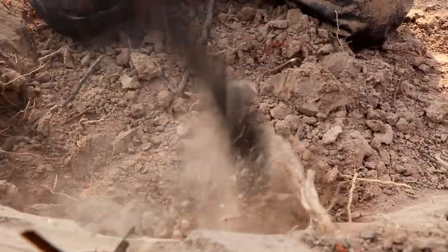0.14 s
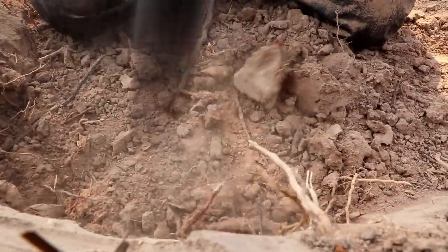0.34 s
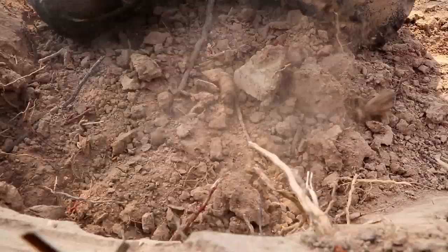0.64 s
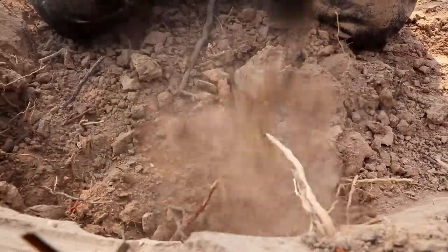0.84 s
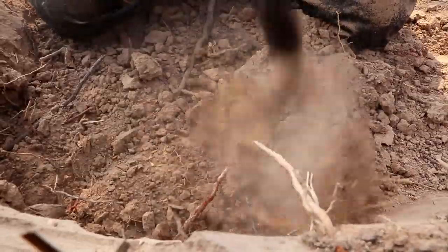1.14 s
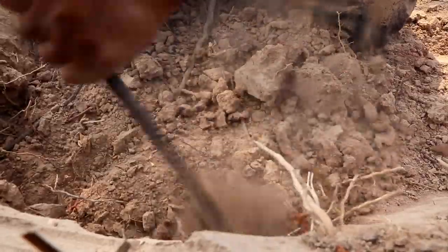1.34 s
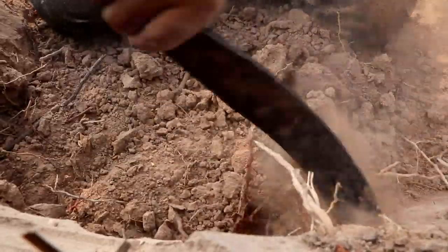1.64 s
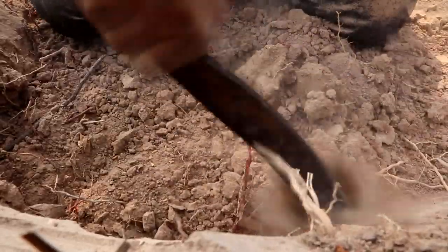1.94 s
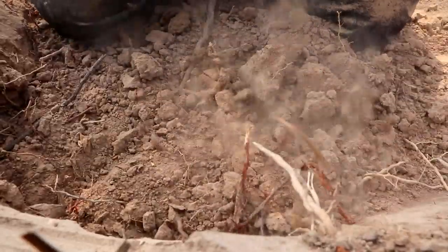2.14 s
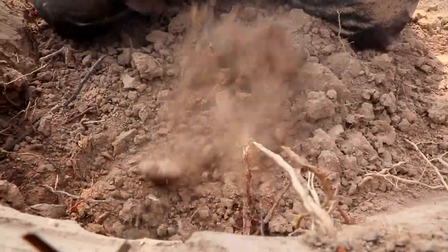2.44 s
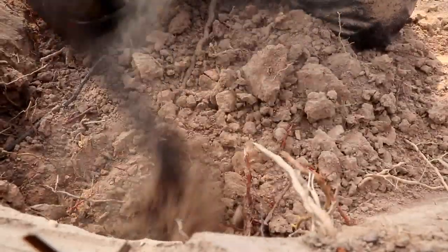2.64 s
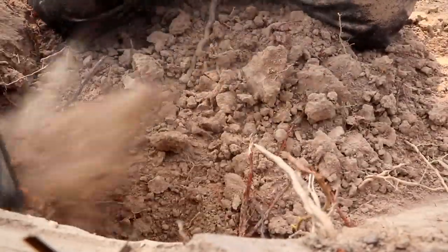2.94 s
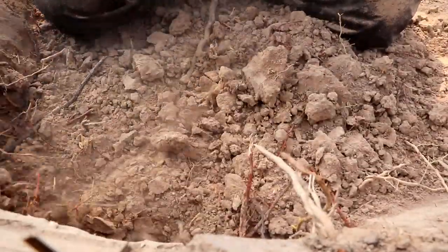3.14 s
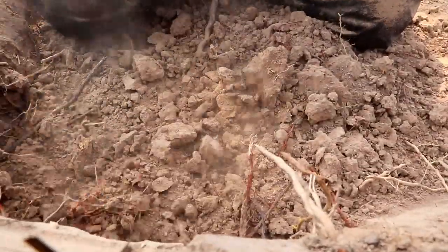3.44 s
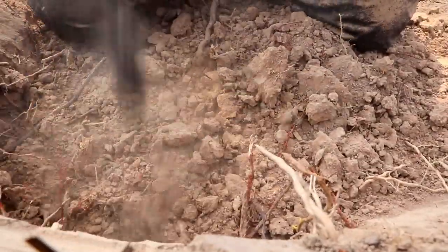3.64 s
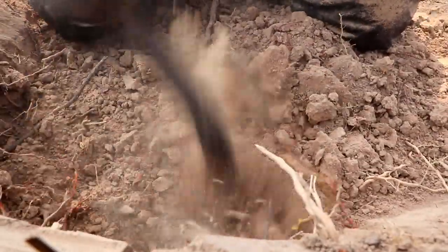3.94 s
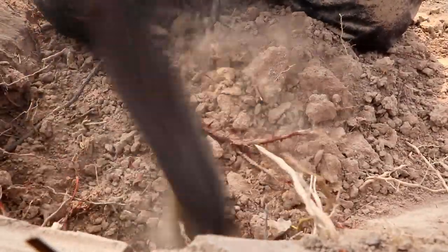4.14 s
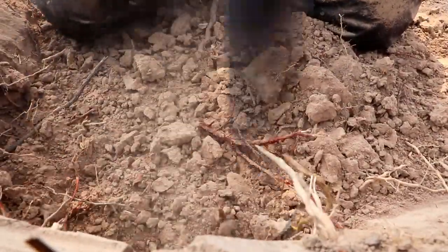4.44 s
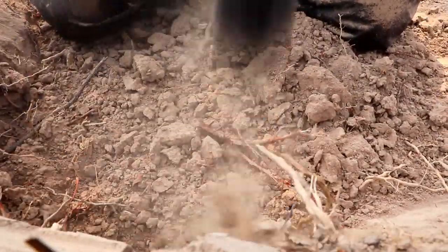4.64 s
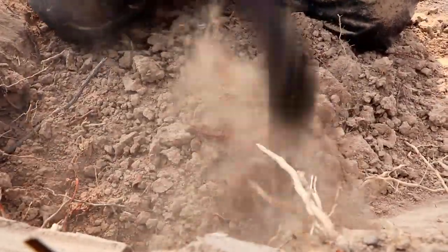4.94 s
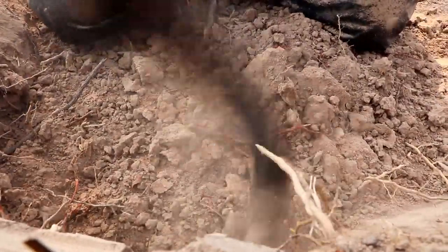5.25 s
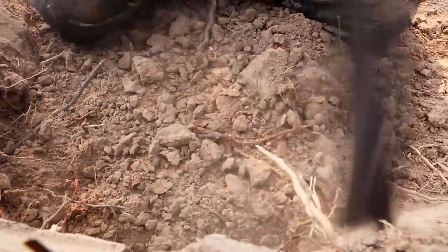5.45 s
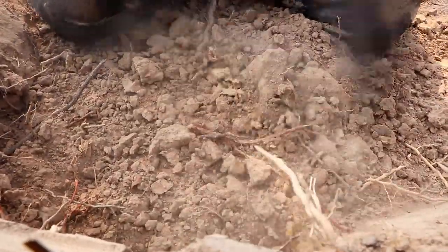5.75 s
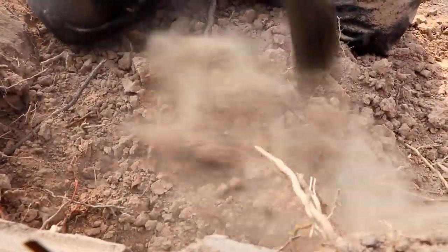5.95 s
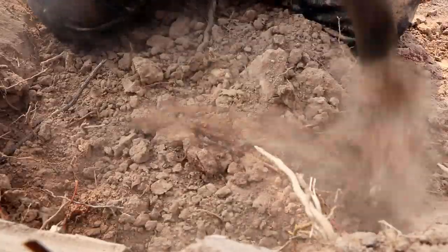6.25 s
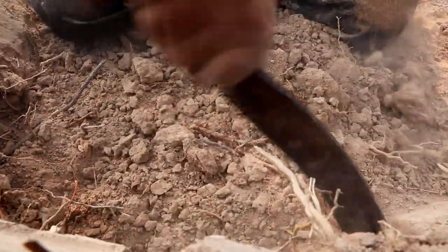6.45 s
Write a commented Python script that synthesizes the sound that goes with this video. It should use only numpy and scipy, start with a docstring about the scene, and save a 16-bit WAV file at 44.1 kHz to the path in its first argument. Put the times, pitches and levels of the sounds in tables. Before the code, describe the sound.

A long steel blade chops rapidly into dry, hard ground, with gritty scrapes and clods of earth falling between strokes.

```python
"""A long steel blade chops dry, hard ground about three times a second, at the rim of a pit, close to
a phone's stereo microphone. Each chop slices in, stops with a thud and ploughs on; grit scrapes the
blade as it is pulled out and makes it ring. Pebbles and clods land in between, over a trickle of
loose soil and a little low wind on the microphone."""
import sys
import numpy as np
from scipy import signal
from scipy.io import wavfile
from scipy.ndimage import uniform_filter1d

SR = 44100
rng = np.random.default_rng(int(sys.argv[2]) if len(sys.argv) > 2 else 0)


def output_pcm(signal):
    """Save a mono or channel-first signal as 16-bit PCM at the path in sys.argv[1].

    Samples are clipped to [-1, 1] before scaling.
    """
    pcm = np.clip(np.atleast_2d(signal).T, -1, 1) * 32767
    wavfile.write(sys.argv[1], SR, np.round(pcm).astype(np.int16))


N = 290178


def undb(db):
    return 10 ** (np.asarray(db) / 20)


def ring(x, modes, levels=None):
    """Sum of two-pole resonances, each driven at its own level in time; white noise keeps its level."""
    out, click, response = 0, np.eye(1, 8192)[0], 0
    for k, (hz, width, db) in enumerate(modes):
        b, a = signal.iirpeak(hz, hz / width, SR)
        gain = (-1) ** k * undb(db)
        out = out + gain * signal.lfilter(b, a, x if levels is None else levels[k] * x)
        response = response + gain * signal.lfilter(b, a, click)
    return out / np.sqrt(np.sum(response ** 2))


def grains(alike, scatter_db, grain_ms, lag=0):
    """Stereo noise in grains of random size; the share `alike` is in both sides, `lag` samples late right."""
    length = max(int(grain_ms * SR / 1000), 1)
    grain_db = scatter_db * np.minimum(rng.exponential(size=N)[:N // length + 1], 4)
    sizes = uniform_filter1d(np.repeat(undb(grain_db), length)[:N], length)
    shared, left, right = rng.standard_normal((3, N)) * sizes / np.sqrt(np.mean(sizes ** 2))
    centre = np.array([shared, np.roll(shared, lag)])
    return np.sqrt(alike) * centre + np.sqrt(1 - alike) * np.array([left, right])


def swell(ms, rise_ms, fall_ms):
    """Exponential rise up to a contact, exponential fall after it."""
    return np.exp(np.minimum(ms, 0) / rise_ms - np.maximum(ms, 0) / fall_ms)


# Wind at the microphone: (time [s], level [dB])
WIND_LEVELS = [(0.0, -61), (1.7, -56), (2.09, -63.5), (2.66, -56.5), (4.56, -58.5), (4.78, -50.5),
               (5.22, -59), (6.58, -55)]


def wind():
    """Air moving over the phone rumbles low."""
    s, db = np.transpose(WIND_LEVELS)
    rumble = ring(grains(.59, .46, 45), [(34, 13, .5), (69, 74, 3.5), (112, 153, -2.5)])
    return undb(np.interp(np.arange(N) / SR, s, db)) * rumble


# Resonances of grit, fine dust and clods: (frequency [Hz], width [Hz], level [dB])
GRIT_MODES = [(1182, 950, 18.5), (2067, 920, 23), (3230, 1810, 19.5), (4314, 560, 17.5)]
HISS_MODES = [(5080, 2600, -10), (7780, 3980, -9), (11490, 2200, -14), (13160, 2000, -19.5)]
CLOD_MODES = [(194, 188, 1), (314, 173, -1), (523, 130, -5)]
# Soil that slides all the time: (grit [dB], clods [dB], hiss [dB])
SLIDE_DB = (-53.5, -55.5, -53)


def trickle(rise_ms=146, fade_ms=120, dust_db=-.55):
    """Loose soil hisses and single crumbs stand out; what each chop throws up patters back after it."""
    ms = np.arange(N) / SR * 1000
    power = np.outer(undb(SLIDE_DB) ** 2, np.ones(N))
    for row in BLADE_CHOPS:
        delay_ms, fall_db, clod_db = row[14:]
        fall = swell(ms - row[0] * 1000 - delay_ms, rise_ms, fade_ms)
        power += np.outer(undb([fall_db, fall_db + clod_db, fall_db + dust_db]), fall) ** 2
    grit, thud, hiss = np.sqrt(power)
    crumbs = ring(grit * grains(.25, 3, 1.2), GRIT_MODES)
    clods = ring(thud * grains(.85, 3.5, 4), CLOD_MODES)
    dust = ring(hiss * grains(.25, 3.8, .8), HISS_MODES)
    return crumbs + clods + dust


def favour(modes, pitch_hz, lift_db, octaves):
    """The place of contact drives the resonances near one pitch harder (dB per resonance)."""
    distance = np.log2(np.array(modes)[:, 0] / pitch_hz) / octaves
    return lift_db * (np.exp(-distance ** 2) - .5)


# Left minus right microphone port: (ground [dB], grit [dB], hiss [dB], blade [dB])
MIC_BALANCE_DB = (2.5, 1.7, 2.6, 1)


def contact(power, row, shapes, knock_db=None):
    """One touch feeds ground, grit, hiss and blade, as far as it has shapes (envelopes over ms)."""
    s, level_db, thud_db, hiss_db, pan_db, blade_db, pitch_hz = row[:7]
    if knock_db is None:  # a small contact's hollow knock follows its thud
        knock_db = -4 + .58 * thud_db
    at = slice(max(int((s - .07) * SR), 0), min(int((s + .16) * SR), N))
    ms = (np.arange(at.start, at.stop) / SR - s) * 1000
    nearest_hz = min((mode[0] for mode in BLADE_MODES), key=lambda hz: abs(np.log(hz / pitch_hz)))
    taken_db = 10 * np.log10(1 + undb(2 * blade_db))  # what rings in the steel is lost to grit and hiss
    drives_db = (np.where(np.array(GROUND_MODES)[:, 0] < 400, thud_db, knock_db),
                 favour(GRIT_MODES, pitch_hz, 2.5, .4) - taken_db,
                 hiss_db + favour(HISS_MODES, pitch_hz, 7, .2) - taken_db / 2,
                 blade_db + favour(BLADE_MODES, nearest_hz, 9, .05) - taken_db)
    for layer, port_db, db, shape in zip(power, MIC_BALANCE_DB, drives_db, shapes):
        sides_db = (pan_db + port_db) * np.array([[.5], [-.5]])
        layer[:, :, at] += (undb(level_db + db[:, None, None] + sides_db) * shape(ms)) ** 2


# Landings near the phone. Every contact opens with the same seven columns; "rel" is against its level:
# (time [s], level [dB], thud [dB rel], hiss [dB rel], left minus right [dB], blade over grit [dB],
#  favoured pitch [Hz], decay [ms])
LANDINGS = [(0.0315, -38, -10, 10, -3, -19, 6700, 3.7), (0.272, -14, -29, -8, -2, 3.5, 3840, 3.6),
            (0.299, -18, -10, -17, -5, -8, 1690, 1.5), (0.364, -20, -4.5, -14, -5, -22, 3120, 5.1),
            (0.369, -26, -15, 8.5, -2, -17, 2630, 2.5), (0.4575, -45, -22, 18.5, 4, -8, 7370, 6.2),
            (0.4724, -45, -4, 19, 5, -13, 1700, 4.2), (0.627, -42, -22, 9, -5, -8, 7880, 3.9),
            (0.634, -35, -9, 3, -2.5, -5, 7690, 11), (0.6502, -27, -22, 4, -5, -17, 7650, 4.7),
            (0.662, -46, -22, 9, 3, -8, 7800, 6.8), (0.682, -33, -27, 2, -10, -3, 7870, 3.8),
            (0.6933, -32.5, -31, 8.5, 1, 7, 8260, 4.5), (0.7007, -33, -24, -6, -13, 11, 8090, 7.8),
            (0.721, -16, -39, -19, -8, 23, 2520, 1.5), (0.7835, -34, -2, 9, -14, -14, 2120, 1.7),
            (0.966, -20.5, -5, -3, -3, -23, 1220, 4), (0.9838, -41, -22, 16, -4, -6, 7700, 1.9),
            (1.0395, -39.5, -24, 13.5, -5, -1, 6130, 3.3), (1.062, -34.5, -3, 3, -5, -2, 3780, 4.9),
            (1.253, -15.5, -28, 13, -4, 15, 2050, 3.9), (1.277, -34, -20, -10, -9, -10, 3230, 2.8),
            (1.313, -22.5, -17, 10, -7, -18, 6750, 2.3), (1.6089, -12, -6, -7, -4, -9, 2520, 2.6),
            (1.629, -30, -29, 10, -11, 1, 6160, 3.4), (1.7075, -31, 4.5, 3, -8, -2, 2400, 3.7),
            (2.022, -35, -24, 12, 3, -14, 2980, 2.8), (2.218, -37.5, -30, -10, -22, -3, 2880, 1.9),
            (2.2264, -41, -28, 15.5, -4, -8, 5800, 4), (2.245, -36.5, -26, 14, -4, 0, 5900, 2.4),
            (2.3722, -15.5, -1.5, -3, -2, -15, 1420, 7.2), (2.9122, -35.5, -2, 0, -4, -8, 2760, 21),
            (3.7454, -40.5, -1, 15, -2, -2, 6070, 5.9), (4.1577, -27.5, -22, 3.5, -6, -6, 5550, 5.3),
            (5.676, -22.5, -31, 7, 1, -12, 3010, 1.8), (5.922, -18.5, -16, 2, -8, 1, 1820, 12),
            (6.3747, -31, -6, -17, -7, -14, 1470, 7.5), (6.5494, -33, -15, 7, -8, -3, 1770, 1.5)]


def pebbles(power):
    """Pebbles and clods land with a sharp edge and die away at once."""
    for row in LANDINGS:
        contact(power, row, [lambda ms: swell(ms, .1, row[7])] * 4)


# The blade at the rim, close up: (seven contact columns, hollow knock [dB rel], blow decay [ms],
#  slice [dB rel], slice rise [ms], plough [dB rel], slump [dB rel], boom [dB rel],
#  delay of falling soil [ms], its grit [dB], its clods over its grit [dB])
BLADE_CHOPS = [(0.188, -6.5, -2.5, -2, -1, -20, 1434, -6.5, 6.2, -4, 9.7, -26, -43, -19, 160, -37.5, -3.5),
               (0.5048, -7.5, -8, -1, -3, -21, 1790, -10.5, 9.5, -1.5, 9.6, -58, -40, -17, 242, -43, -3.5),
               (0.8151, -3, -19, -8.5, -3, 0.5, 2430, -14, 5.8, -5.5, 9.1, -23.5, -37, -35, 170, -43, -2.5),
               (1.1149, -10, -18, -5.5, -5, -5, 2780, -15, 6.1, -25, 15, -30, -21, -49, 191, -41.5, -4),
               (1.441, -2, -9.5, -4.5, -1.5, -18, 1660, -10.5, 9.4, -17, 6.1, -28.5, -42, -51, 175, -40.5, -8),
               (1.7356, -10, -5, -2, -4, -10.5, 2580, -6.5, 7.2, -12, 17, -19.5, -37, -24, 121, -40, -8.5),
               (2.0412, -5.5, -27, -25, -3.5, 1, 2900, -18, 3.4, -27, 7, -31, -24, -48, 229, -45.5, -11),
               (2.359, -6.5, -21, -4, -0.5, 2, 1310, -12, 9, -13.5, 6.4, -20.5, -20.5, -31, 194, -39.5, -9),
               (2.6646, -2, -4, -1.5, -2.5, -11, 1043, -6.5, 3.25, -17, 6.5, -20.5, -35, -29, 110, -44, -3),
               (2.9935, -7, -13.5, -3, -1, -35, 1410, -10.5, 8.5, -14.5, 12.7, -27, -27, -57, 113, -44.5, -0.5),
               (3.3053, -4, -5, -3.5, -2, -7, 1460, -18.5, 6.1, -5.5, 5.2, -20, -29, -79, 100, -40.5, -9.5),
               (3.6167, 8.5, -15.5, -6.5, -1, -2.5, 1870, -16, 2.04, -24.5, 5.7, -27, -33.5, -29.5, 131, -41.5, -6.5),
               (3.9479, 1.5, -13, -4, -2.5, -20, 4010, -9, 4.6, -15, 6.4, -24, -29, -47, 244, -43.5, 0.5),
               (4.2699, 0.5, -11, -2.5, -2, 0, 2400, -12, 4.5, -14.5, 5.2, -22.5, -27, -38, 120, -45.5, -5),
               (4.594, 2, -13.5, -3.5, -3, -15.5, 1062, -5.5, 4.1, -20, 5.8, -28.5, -28, -36, 189, -48, -1),
               (4.9222, -2, -12, -5, -2, -9.5, 1100, -15, 4.5, -10.5, 5.1, -22.5, -26, -49, 140, -40, -4.5),
               (5.2538, -9.5, -9, -1.5, -1.5, -25, 2280, -5.5, 8.1, -2.5, 8.5, -21, -15.5, -23, 190, -53.5, 0.5),
               (5.5732, -1.5, -13, -6, -4, -4, 2820, -15.5, 3.8, -19, 6.6, -18, -26, -49, 97, -42.5, -8),
               (5.9022, -2, -12, -8, 0.5, 1, 3160, -15, 8, -25.5, 12.4, -29, -47, -30, 90, -42.5, -7.5),
               (6.2402, -10.5, -12, -1, -5, -11, 1650, -16, 9.4, -10, 5, -26.5, -25, -23, 194, -44.5, -3.5),
               (6.568, -12.5, -17, -4, -4, -5, 1720, -15, 15, -4, 7.3, -27, -22, -47, 150, -55, -6)]


def chops(power, plough_ms=43.4, stop_ms=11, rub_db=6, crumble_db=3):
    """The blade slices in, strikes, and ploughs on at an even level until the soil stops it."""
    for row in BLADE_CHOPS:
        knock_db, blow_ms, slice_db, slice_ms, plough_db, slump_db = row[7:13]
        blow = lambda ms: swell(ms, .1, blow_ms)
        cut = lambda ms: (ms < 0) * undb(slice_db) * swell(ms, slice_ms, 1)
        plough = lambda ms: (ms >= 0) * undb(plough_db) * (1 - np.tanh((ms - plough_ms) / stop_ms)) / 2
        earth = lambda ms: blow(ms) + cut(ms) + plough(ms)
        # ploughing crumbles fine dust; slicing in rubs the still undamped steel
        dust = lambda ms: blow(ms) + cut(ms) + undb(crumble_db) * plough(ms)
        steel = lambda ms: blow(ms) + undb(rub_db) * cut(ms) + plough(ms)
        contact(power, row, (earth, earth, dust, steel), knock_db)
        # the lifted earth slumps with a soft low thump when the blade stops
        slump = (row[0], row[1], slump_db, 0, row[4], 0, row[6])
        contact(power, slump, [lambda ms: swell(ms - plough_ms, 4.4, 4.4)], knock_db=slump_db - 12)


def booms(boom_hz=55, decay_s=.015):
    """A deep, quickly damped shake of the ground under every chop."""
    blows, s = np.zeros(N), np.arange(SR // 10) / SR
    for row in BLADE_CHOPS:
        blows[int(row[0] * SR)] = undb(row[1] + row[13])
    shake = np.sin(2 * np.pi * boom_hz * s) * np.exp(-s / decay_s)
    return signal.fftconvolve(blows, shake)[:N]


def clanks(clank_db=-9, decay_ms=4.9):
    """Every chop meets a hard lump that rings briefly at its own pitch."""
    out, s = np.zeros((2, N + SR // 20)), np.arange(SR // 20) / SR
    for row in BLADE_CHOPS:
        i, sides_db = int(row[0] * SR), row[4] * np.array([[.5], [-.5]])
        tone = np.sin(2 * np.pi * row[6] * s) * np.exp(-s * 1000 / decay_ms)
        out[:, i:i + len(s)] += undb(row[1] + clank_db + sides_db) * tone
    return out[:, :N]


# Grit on the steel, close up: (seven contact columns, rise [ms], fade [ms])
GRIT_SCRAPES = [(0.3176, -29, -3.5, -1.5, -4, -12, 1470, 28, 11),
                (0.5906, -36.5, -22, 0.5, -3, 3, 1930, 15, 15), (0.917, -20, -19, -5, -3, 3, 3270, 20, 27),
                (1.137, -13.5, -7, -3, -2.5, -6, 2830, 6.3, 12),
                (1.2144, -26, -23, -3, -2, -4, 2900, 30, 25), (1.5, -25.5, -11, -3, -3, -3, 1890, 4.5, 19),
                (1.5394, -29.5, -22, 2, -3.5, -3, 4300, 24, 35),
                (1.6501, -34, -33, 3, -13, 1, 3480, 15, 21), (1.8103, -31, -40, 1, -4, -4, 2050, 17, 21),
                (1.8318, -17.5, -29, -1, -7.5, 9, 1980, 3.5, 6),
                (1.907, -35, -11, -9, -11, 0, 1920, 38, 8.6),
                (2.0497, -11.5, -14.5, -1.5, -3, -3, 2740, 11, 16.1),
                (2.139, -25, -26, -1.5, -2, 4, 3020, 11, 15.5),
                (2.1617, -18, -45, 7, -3, 9.5, 3080, 8.8, 4.7),
                (2.452, -28.5, -15, -1, -2, -0.5, 2160, 8.6, 19),
                (2.758, -25, -31, 1.5, -2, -3, 4030, 3.2, 14.4),
                (2.806, -37.5, -7, 8, -6, 0, 4070, 3.2, 9.1),
                (3.0774, -33.5, -33, 4.5, -1, -7, 1840, 2.3, 79),
                (3.127, -34, -29, 0, -3, -9, 990, 39, 4.3), (3.411, -28, -19, 3, -3, -5, 1900, 3.7, 11),
                (3.448, -36, -3, 6.5, -4, -16, 5800, 18, 33), (3.722, -31.5, -26, 3, -2, -1, 2150, 2.8, 18),
                (4.042, -34.5, -23, -2, -3, -1, 2620, 30, 54), (4.086, -35, -3.5, -1, -5, 0, 3500, 40, 3.9),
                (4.374, -34, -18, 0, -4, 8, 2090, 26, 5.5), (4.7, -25, -12, 3.5, -2.5, 1, 2930, 14, 6.1),
                (4.722, -20, -14.5, -1.5, -2.5, -2.5, 4320, 8.3, 17),
                (4.789, -36, 0, -5, -4, -5, 3540, 4.9, 15), (4.9656, -23.5, -19, -5, -3, -3, 1860, 15, 20),
                (5.0472, -26, -13, -2.5, -6, -2, 1640, 2.8, 8.6),
                (5.198, -37.5, -19, 8.5, -3, -1, 3100, 3.2, 5.7),
                (5.2345, -16.5, -10, -8, -2.5, 1.5, 2660, 6.7, 33),
                (5.3494, -37, -35, 1.5, -4, -9, 2800, 56, 52), (5.669, -24, -36, -34, -5, 8, 2800, 6.4, 29),
                (5.746, -22, -30, -30, -2, 6, 2490, 15, 14), (5.991, -26, -40, -1, -4.5, 4, 2750, 8.8, 23),
                (6.0726, -39, -4.5, 6, -6, -5, 2800, 4.6, 24),
                (6.3028, -18.5, -29, -1, -4, -1, 2580, 8.4, 12)]


def scrapes(power):
    """Grit dragged along the blade swells and fades."""
    for row in GRIT_SCRAPES:
        contact(power, row, [lambda ms: swell(ms, row[7], row[8])] * 4)


def pushes(rows, push_db, push_ms):
    """Every sudden stop pushes once, a short half-sine."""
    out, length = np.zeros(N), push_ms * SR / 1000
    half_sine = np.sin(np.pi * np.arange(int(length)) / length)
    for row in rows:
        i = int(row[0] * SR)
        out[i:i + len(half_sine)] = undb(push_db) * half_sine
    return out


# Resonances of the hard ground and the steel blade: (frequency [Hz], width [Hz], level [dB])
GROUND_MODES = [(130, 60, -13), (190, 70, -8), (290, 65, 0), (500, 100, -7), (668, 85, -2), (915, 120, -6)]
BLADE_MODES = [(1260, 65, -6), (1800, 90, -11), (2060, 65, 1), (2480, 55, -10), (3030, 80, 2),
               (3300, 110, -11), (4200, 80, -3), (5360, 110, -2), (6480, 110, -10), (8020, 110, -5)]


def digging():
    """Particles crushed in every landing, chop and scrape excite the ground, the air and the blade."""
    layers = (GROUND_MODES, GRIT_MODES, HISS_MODES, BLADE_MODES)
    power = [np.zeros((len(modes), 2, N), np.float32) for modes in layers]
    pebbles(power)
    chops(power)
    scrapes(power)
    ground, grit, hiss, blade = map(np.sqrt, power)
    crack = pushes(BLADE_CHOPS + LANDINGS, push_db=-2.5, push_ms=.31)
    shove = pushes(BLADE_CHOPS, push_db=3, push_ms=.45)
    crunch = ring(grains(.2, 2.5, .6, lag=3) + crack, GRIT_MODES, grit)
    # small particles radiate no bass
    crunch = signal.sosfilt(signal.butter(2, 800, "high", fs=SR, output="sos"), crunch)
    fizz = ring(grains(.59, 2.5, .3), HISS_MODES, hiss)
    # clods break duller than loose dust trickles
    fizz = signal.sosfilt(signal.butter(1, 13500, fs=SR, output="sos"), fizz)
    thud = ring(grains(.84, .36, .82, lag=1) + shove, GROUND_MODES, ground)
    steel = ring(grains(.54, 2.5, .6, lag=3) + crack, BLADE_MODES, blade)
    return thud + booms() + clanks() + crunch + fizz + steel


def scene():
    return digging() + trickle() + wind()


def record(dry):
    """The hardest blows clip the phone; the top is cut above 16.3 kHz."""
    top_cut = signal.ellip(8, .2, 60, 16300, fs=SR, output="sos")
    return np.clip(signal.sosfilt(top_cut, np.clip(dry, -.93, .93)), -1, 1)


dry = scene()
out = record(dry)
output_pcm(out)
```